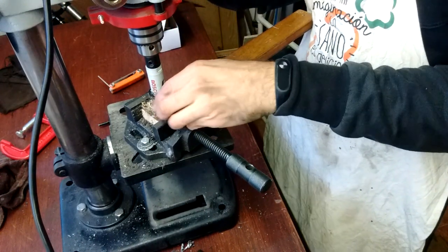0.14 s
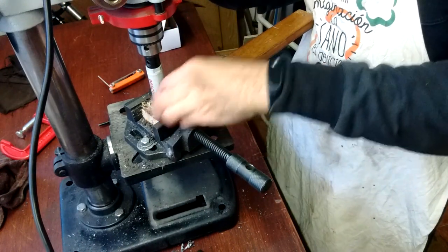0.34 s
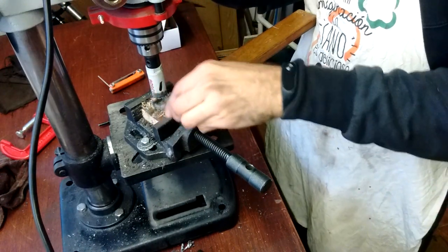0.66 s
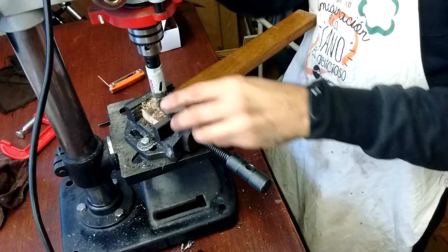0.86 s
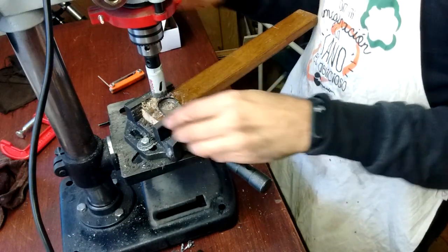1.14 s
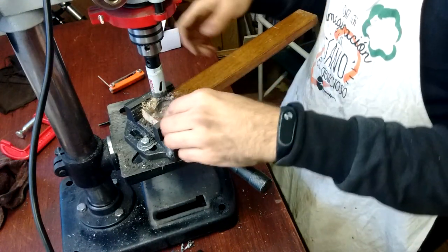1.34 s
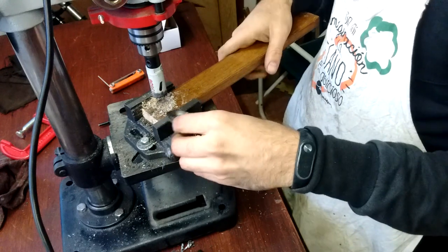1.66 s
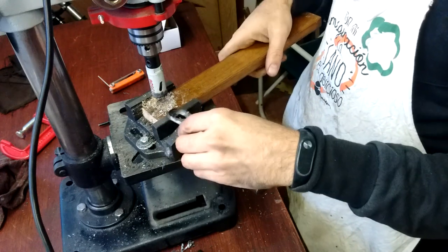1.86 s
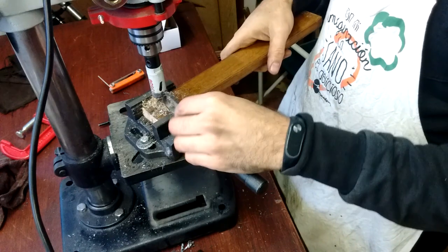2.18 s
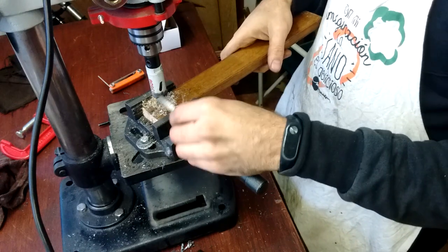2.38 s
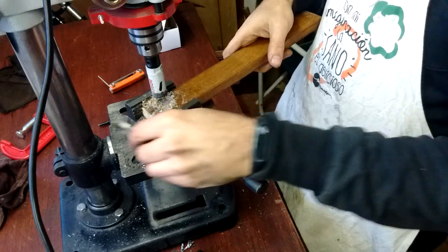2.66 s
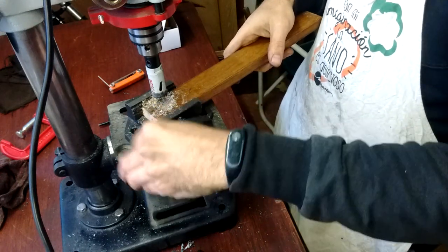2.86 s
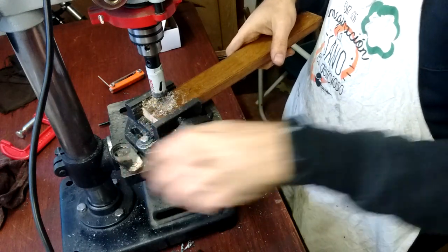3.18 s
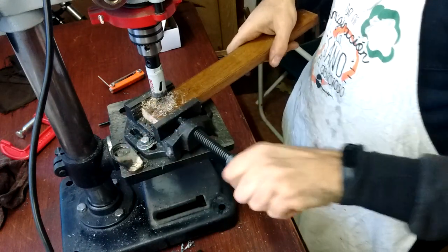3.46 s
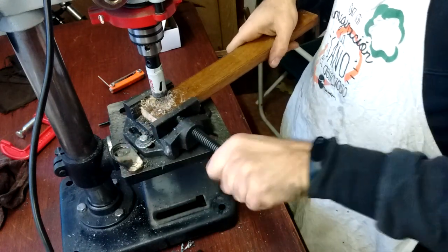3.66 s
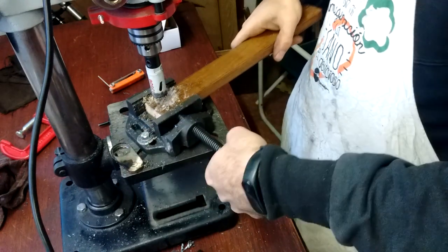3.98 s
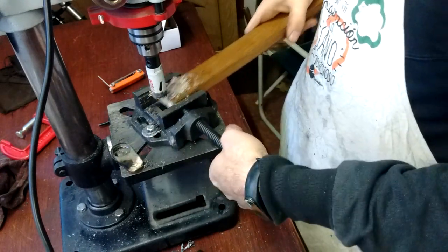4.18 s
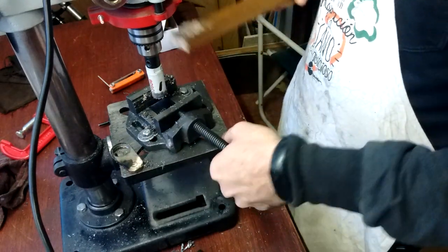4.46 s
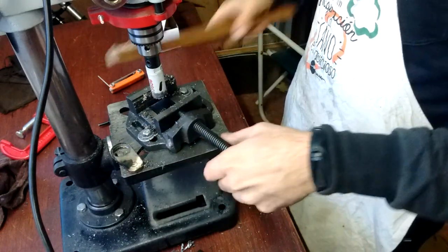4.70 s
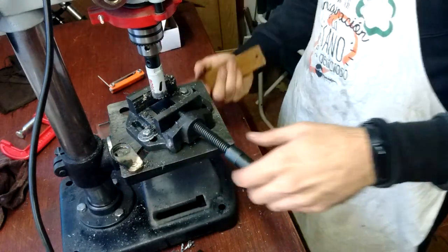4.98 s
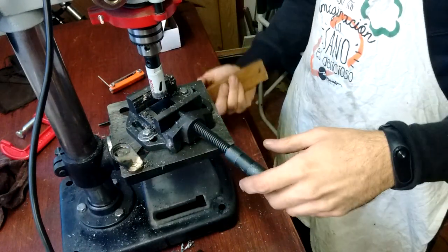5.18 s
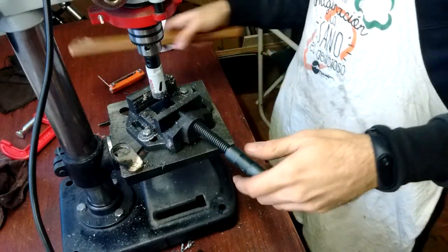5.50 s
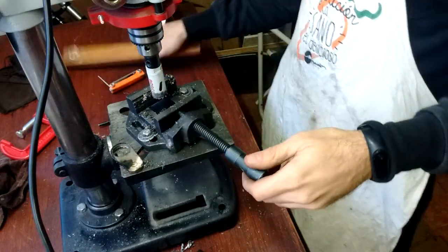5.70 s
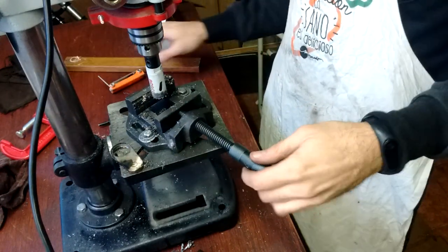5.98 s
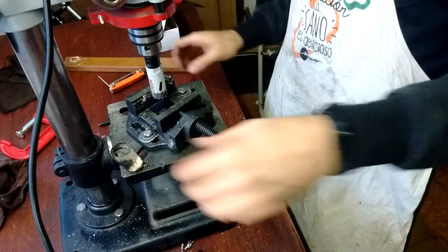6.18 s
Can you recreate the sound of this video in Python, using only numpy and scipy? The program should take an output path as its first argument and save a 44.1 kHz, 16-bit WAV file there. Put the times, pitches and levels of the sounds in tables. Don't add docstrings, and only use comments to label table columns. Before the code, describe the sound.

A steel key clinks and scrapes on an iron vise, the vise screw knocks loose, then a wooden board drags out, raps twice and clatters down.

```python
import sys
import numpy as np
from scipy import signal
from scipy.fft import rfft, irfft, next_fast_len
from scipy.io import wavfile
from scipy.ndimage import uniform_filter1d

SR = 44100
rng = np.random.default_rng(int(sys.argv[2]) if len(sys.argv) > 2 else 0)


def log_audio(samples):
    frames = np.atleast_2d(samples).T
    limited = np.clip(frames, -1, 1)
    pcm = np.round(limited * 32767).astype(np.int16)
    wavfile.write(sys.argv[1], SR, pcm)


def boost_factor(decibels):
    exponent = np.asarray(decibels, float) / 20
    return 10 ** exponent


N = 279594


def evened(x):
    return x / np.sqrt(np.mean(x ** 2) + 1e-20)


def peaked(x, db):
    return boost_factor(db) * x / abs(x).max()


def read(points, hz):
    f, value = np.transpose(points)
    return np.interp(np.log(hz + 1), np.log(f + 1), value)


def add(mix, start_s, sound):
    part = mix[round(start_s * SR):][:len(sound)]
    part += sound[:len(part)]


def shaped(x, gain):
    size = next_fast_len(x.shape[-1] + 2048)
    spectrum = rfft(x, size) * gain(np.fft.rfftfreq(size, 1 / SR))
    return irfft(spectrum, size)[..., :x.shape[-1]]


def band(x, low_hz, high_hz):
    return signal.sosfilt(signal.butter(2, [low_hz, high_hz], "band", fs=SR, output="sos"), x)


def pair(alike, z):
    alike = np.clip(alike, 0, 1)[:, None]
    return np.array([z[0], alike * z[0] + np.sqrt(1 - alike ** 2) * z[1]])


# start_s, depth_db
GAIN_DUCKS = [
    (-.45, 8),
    (.93, 8),
    (2.92, 7),
    (4.905, 13),
    (5.183, 16),
    (5.833, 17),
]


def ducking_db(t):
    start_s, depth_db = np.transpose(GAIN_DUCKS)[:, :, None]
    hold_s, recover_db_per_s = .45, 18.
    left_db = depth_db - recover_db_per_s * np.maximum(t - start_s - hold_s, 0)
    drop = np.clip((t - start_s) / .06, 0, 1)
    return -np.max(drop * np.maximum(left_db, 0), axis=0)


# freq_hz, density_db (per Hz)
FLOOR_CURVE = [(20, -27), (45, -6), (100, -1), (250, -5), (500, -7.5), (1000, -11.5), (2000, -18),
               (3500, -19.5), (6000, -24.5), (8500, -24.5), (10000, -25.5), (14500, -26.5), (15600, -27),
               (16200, -46)]
# freq_hz, width_hz, over_floor_db
ROOM_HUM = [(75, 10, 8), (98.7, 6.8, 12), (143, 2.7, 15.5), (215, 12, 9.5)]


def air():
    hz, t, z = signal.stft(rng.standard_normal((2, N)), SR, nperseg=4096)
    humming_db = sum(db / (1 + (2 * (hz - f) / width) ** 2) for f, width, db in ROOM_HUM)
    patches = uniform_filter1d(rng.standard_normal(z.shape[1:]), 40, 0)
    patches = evened(uniform_filter1d(patches, 2, 1))
    z = pair(.2 + 0 * hz, z)
    z = z * boost_factor((read(FLOOR_CURVE, hz) + humming_db)[:, None] + 0.67 * patches)

    def level_db(low_hz, high_hz):
        inside = z[0][(hz > low_hz) & (hz < high_hz)]
        return 10 * np.log10(np.mean(np.sum(abs(inside) ** 2, 0)) * 4 / 3)

    hum_db = -50. + .8 * ducking_db(t) - level_db(60, 400)
    hiss_db = -60. + ducking_db(t) - level_db(3000, 12000)
    hissy = np.clip(np.log(hz / 300 + 1e-9) / 5.4, 0, 1)[:, None]
    z = z * boost_factor((1 - hissy) * hum_db + hissy * hiss_db)
    return signal.istft(z, SR, nperseg=4096)[1][:, :N]


# freq_hz, t60_s
ROOM_DECAY = [(120, 0.39), (330, 0.58), (870, 0.46), (2300, 0.46), (6000, .35), (14000, 0.31)]
# freq_hz, likeness (0 to 1)
ROOM_LIKENESS = [(100, 0.826), (800, 0.73), (1800, 0.074), (16000, .1)]


def room(x):
    hz, t, z = signal.stft(rng.standard_normal((2, SR)), SR, nperseg=256)
    z = pair(read(ROOM_LIKENESS, hz), z) * boost_factor(-60 * t / read(ROOM_DECAY, hz)[:, None])
    tail = signal.istft(z, SR, nperseg=256)[1]
    tail *= np.clip(np.arange(tail.shape[1]) / SR / 0.0044, 0, 1)
    return signal.fftconvolve(x[None], tail / np.linalg.norm(tail[0]), axes=1)[:, :N]


def placed(x, lag, wet_db):
    late = shaped(x, lambda hz: np.exp(-2j * np.pi * hz * lag / SR))
    x, late = np.roll([x, late], 45, axis=1)
    return np.array([late, x]) + boost_factor(wet_db) * room(x)


def ringing(modes):
    t = np.arange(SR // 3) / SR
    return sum(boost_factor(db - 60 * t / t60) * np.sin(2 * np.pi * hz * t) for hz, db, t60 in modes)


# freq_hz, level_db
THUD_CURVE = [(60, -46), (200, -3), (500, -8), (1300, -3), (2500, -1), (5000, -4), (9000, -40.5)]


def dense_thud():
    t = np.arange(SR // 3) / SR
    noise = evened(shaped(rng.standard_normal(len(t)), lambda hz: boost_factor(read(THUD_CURVE, hz))))
    return noise * boost_factor(10. - 60 * t / 0.065)


# freq_hz, level_db
CRACK_CURVE = [(1500, -2.5), (2450, 7), (3600, 3), (6000, -7), (8500, -19), (11000, -20), (15500, -22.5),
               (16500, -45.5)]


def hit(modes, thin_hz, dull_hz, body_db, crack_db, note_hz, contact_hz, rattle_s):
    t = np.arange(2048) / SR
    chatter, snap = rng.standard_normal((2, len(t)))
    force = chatter * np.exp(-t / rattle_s) * 0.4
    force[0] += 3
    body = ringing(modes + [(note_hz, 4., .03)])
    body[0] += 40.
    sound = signal.fftconvolve(force, body)
    thud = dense_thud()
    thud[:len(t)] *= np.sqrt(np.cumsum(force ** 2) / np.sum(force ** 2))
    sound[:len(thud)] += thud * np.linalg.norm(force)
    contact = signal.butter(2, [thin_hz, contact_hz], "band", fs=SR)
    sound = peaked(signal.lfilter(*contact, sound), body_db)
    crack = shaped(snap, lambda hz: boost_factor(read(CRACK_CURVE, hz)) / (1 + (hz / dull_hz) ** 4))
    sound[:len(t)] += peaked(crack * np.exp(-t / (.5 * rattle_s)), crack_db + 13)
    return sound


def struck(rows, modes, thin_hz, dull_hz, contact_hz):
    out = np.zeros(N)
    for start_s, body_db, crack_db, note_hz, rattle_s in rows:
        add(out, start_s, hit(modes, thin_hz, dull_hz, body_db, crack_db, note_hz, contact_hz, rattle_s))
    return out


# freq_hz, level_db, t60_s
TABLE_MODES = [(162.5, -7.5, 0.047), (226, -7, 0.2), (345, -6, 0.2), (433, 6, 0.045), (595, -5.5, 0.086),
               (754, -4, 0.063), (1068.7, -5, 0.094), (1329, -8, 0.036), (1780, -17, 0.056)]
# freq_hz, level_db, t60_s
KEY_LOW_MODES = [(3760, 1, 0.05), (5450, 5, 0.076), (5440, -7, .3), (5462, -11, 0.18), (9590, -22, .08)]
# freq_hz, level_db, t60_s
KEY_HIGH_MODES = [(8190, -0.5, 0.097), (8370, -9.5, 0.081), (8160, -11.5, .3), (11430, -14, 0.2),
                  (15330, -8, .1), (15280, -18, .2)]


def rub(rumble_db, bite_db, squeak_hz, reach, fizz_under_db, touch_db):
    n = len(rumble_db)
    grit_db = rumble_db + bite_db
    fizz_db = rumble_db + reach * bite_db + fizz_under_db
    chance, size = rng.random(n), rng.exponential(1, n)
    hiss, grip, spray = rng.standard_normal((3, n))

    clumps = boost_factor(3.6 * evened(uniform_filter1d(grip, 300)))
    slipping = chance < 1800 / SR
    slips = evened(slipping * boost_factor(3.2 * np.minimum(size, 5)) * np.sign(hiss)) + 0.42 * hiss
    slips = evened(slips * clumps) * signal.windows.tukey(n, .1)

    def through(db, body):
        return signal.fftconvolve(slips * boost_factor(db), body / np.linalg.norm(body))

    out = through(rumble_db - 3.5, ringing(TABLE_MODES))
    out += through(grit_db + touch_db, ringing(KEY_LOW_MODES))
    out += through(fizz_db + touch_db + 4, ringing(KEY_HIGH_MODES))

    turn, r = np.exp(2j * np.pi * np.cumsum(squeak_hz) / SR), np.exp(-np.pi * 45. / SR)
    squeak = evened((turn * signal.lfilter([1], [1, -r], slips / turn)).real)
    lock_db = 14. / (1 + (2 * (squeak_hz - 433.) / 60.) ** 2)
    out[:n] += squeak * boost_factor(rumble_db - 13. + lock_db)

    out[:n] += boost_factor(rumble_db - 12.5) * evened(band(slips, 250, 1100))
    out[:n] += boost_factor(grit_db - 4.5) * evened(band(slips, 2500, 4700))
    out[:n] += boost_factor(rumble_db - 22.) * evened(band(slips, 70, 170))
    out[:n] += boost_factor(fizz_db + 1.0) * evened(band(slips + .2 * spray, 4800, 13000))
    return out


def stroke(length_s, pressure_db, bite_db, squeak_hz):
    t = np.arange(0, length_s, 1 / SR)
    u = t / length_s
    bite_in_db = -20 * np.clip(1 - t / .008, 0, 1)
    return pressure_db + bite_in_db - 10. * u ** 2, bite_db, squeak_hz * (1 - .08 * u)


def strokes(rows, **material):
    out = np.zeros(N)
    for start_s, *controls in rows:
        add(out, start_s, rub(*stroke(*controls), **material))
    return out


# start_s, length_s, pressure_db, bite_db, squeak_hz
WOOD_STROKES = [
    (3.41, .06, -48, -12, 300),
    (3.466, .075, -36, -10, 320),
    (5.766, .025, -34, -15, 750),
    (5.85, .09, -25, -6, 1780),
    (5.975, .09, -29, -7, 1080),
]


def wood_rubs():
    return strokes(WOOD_STROKES, reach=.9, fizz_under_db=-38., touch_db=-40.)


# start_s, pressure_db, bite_db, squeak_hz
DRAG_PATH = [
    (3.98, -27, -20, 634),
    (4.05, -31, -4, 700),
    (4.17, -29, -5, 600),
    (4.21, -25, -2, 450),
    (4.26, -36, 5, 1750),
    (4.32, -38, 7, 1780),
    (4.36, -30, -8, 1080),
    (4.46, -29, -5, 345),
    (4.56, -50, -8, 350),
]


def board_slide():
    start_s, *columns = np.transpose(DRAG_PATH)
    t = np.arange(start_s[0], start_s[-1], 1 / SR)
    controls = [np.interp(t, start_s, column) for column in columns]
    out = np.zeros(N)
    add(out, start_s[0], rub(*controls, reach=.9, fizz_under_db=-12., touch_db=-30.))
    return out


# start_s, length_s, pressure_db, bite_db, squeak_hz
KEY_STROKES = [(0., .36, -49, -14, 1200), (.358, .16, -22, -22, 455), (.55, .2, -52, 4, 520),
               (.815, .09, -34, -20, 820), (1.358, .1, -44, -1, 300), (1.6, .11, -39, -7, 700),
               (1.725, .075, -35, -17, 445), (1.83, .14, -38, -5, 1300), (1.972, .05, -34, -27, 480),
               (2.05, .18, -39, -10, 720), (2.24, .1, -43, -10, 600)]


def key_rubs():
    return strokes(KEY_STROKES, reach=.55, fizz_under_db=-18., touch_db=-15.)


# freq_hz, level_db, t60_s
BENCH_MODES = [(233, -14, .12), (442, -3.5, 0.024), (750, -9, .05), (900, -17, 0.013), (1007, -3, 0.08),
               (1330, 0, 0.09), (1460, -1, 0.031), (1780, 6, 0.082), (2362, 0, 0.025), (3030, 1, 0.15),
               (3223, 9, 0.03), (3480, -14, .06)]
# start_s, body_db (peak), crack_db, note_hz, rattle_s
LAY_DOWN = [
    (5.766, -37.5, -65, 498, 0.004),
    (5.833, 0, -22, 1770, 0.002),
    (5.84, 2.5, -24.5, 1780, 0.0019),
    (5.883, -13, -39, 1810, 0.0026),
    (5.957, -7.5, -21, 1420, 0.0055),
]


def bench_clatter():
    return struck(LAY_DOWN, BENCH_MODES, thin_hz=290.0, dull_hz=5200.0, contact_hz=2800.)


# freq_hz, level_db, t60_s
VISE_MODES = [(224, -9.5, 0.42), (345, -21, 0.24), (459, -6, 0.12), (600, -10, 0.1), (742, 3.5, 0.018),
              (1064.6, -10, 0.09), (1348, -10, 0.065), (1510, -17, 0.12), (2264, 5, 0.044),
              (2970, -7, 0.11), (3020, -10.5, 0.076), (3680, -2, .05), (4480, -11.5, 0.03)]
# start_s, body_db (peak), crack_db, note_hz, rattle_s
SCREW_KNOCKS = [(0.372, -11.5, -25.5, 793, 0.0055), (0.391, -8, -38, 430, 0.0046),
                (0.464, -15, -38, 587, 0.004), (0.499, -24, -45, 1350, 0.004),
                (3.468, -36, -31, 747, 0.011), (3.541, -4, -14, 1300, 0.003), (3.762, -5.5, -17, 420, 0.01),
                (3.958, -7, -36.5, 1000, 0.0033), (4.004, -22.5, -31, 604, 0.0059),
                (4.179, -18, -31, 1050, 0.006), (4.196, -13, -32.5, 600, 0.0029),
                (4.212, -18, -36, 230, 0.004), (4.313, -22, -22.5, 1760, 0.0068),
                (4.43, -22, -45, 345, 0.015), (4.49, -34.5, -36, 334, 0.0062)]
# start_s, body_db (peak), crack_db, note_hz, rattle_s
KEY_BOUNCE = [
    (2.9258, -2, -24, 1388, 0.0016),
]


def vise_knocks():
    knocks = struck(SCREW_KNOCKS, VISE_MODES, thin_hz=300., dull_hz=8500.0, contact_hz=1700.)
    return knocks + struck(KEY_BOUNCE, VISE_MODES, thin_hz=750., dull_hz=11000.0, contact_hz=1900.)


# start_s, body_db (peak), tick_db, note_hz, high_ring_db
KEY_CLINKS = [(0.818, -30, -56, 791, -70), (0.82, -33, -47, 1120, -68), (0.894, -25, -52, 740, -61),
              (0.907, -17, -27, 1500, -45), (0.929, -22, -19, 1175, -20), (0.955, -26, -46, 740, -27.5),
              (1.36, -27, -50, 732, -68), (1.407, -24, -47, 221, -72), (1.596, -19, -45, 644, -53),
              (1.81, -12, -27, 1306, -25), (1.864, -24, -45, 1310, -46), (1.972, -15, -64, 410, -58),
              (2.027, -14.5, -27, 780, -36), (2.108, -40, -40, 342, -40.5), (2.149, -27, -45, 587, -43),
              (2.241, -16, -50, 226, -62), (3.272, -46, -63, 511, -72)]


def key_clinks():
    out, low, high = np.zeros(N), ringing(KEY_LOW_MODES), ringing(KEY_HIGH_MODES)

    def clink(start_s, body_db, tick_db, note_hz, high_db, held_db=0):
        add(out, start_s, hit(VISE_MODES, 300., 21000.0, body_db - 6, tick_db - 1.5, note_hz, 3200.0, 0.0059))
        add(out, start_s, peaked(low, tick_db + held_db + 9.5) + peaked(high, high_db + 4))

    for row in KEY_CLINKS:
        clink(*row)
    clink(start_s=2.915, body_db=-2.5, tick_db=-12.5, note_hz=1520, high_db=-30, held_db=-21.)
    return out


# freq_hz, level_db, t60_s
BOARD_MODES = [(119, -9, 0.14), (226, -1, 0.2), (289, -2, 0.041), (345, -4.5, 0.087), (415, -0.5, .06),
               (452, -2, 0.073), (635, 1, 0.045), (760, 2, .05), (940, -1, 0.056), (1000, 0, 0.067),
               (1100, -4, 0.034), (1486, -9, 0.032)]
# start_s, body_db (peak), crack_db, note_hz, rattle_s
BOARD_HITS = [
    (4.905, 5, -20, 586, 0.0015),
    (5.183, 1.5, -31, 604, 0.0032),
    (5.274, -15, -60, 620, .003),
    (5.792, -2, -38, 486, 0.0018),
]


def board_raps():
    return struck(BOARD_HITS, BOARD_MODES, thin_hz=90., dull_hz=17000.0, contact_hz=1050.)


# freq_hz, level_db
LEFT_SHADE = [(100, -4.5), (500, -5.5), (1500, -4.5), (4500, -10), (9000, -4), (11000, -20.5), (16000, -21)]


def scene():
    rubs = key_rubs() + wood_rubs() + board_slide()
    close = placed(rubs, lag=5.43, wet_db=-3.)
    close += placed(bench_clatter(), lag=4.5, wet_db=-2.5)
    close += placed(vise_knocks(), lag=5.2, wet_db=-6.0)
    close += placed(key_clinks(), lag=4.76, wet_db=-8.5)
    close += placed(board_raps(), lag=4.9, wet_db=-4.0)
    no_bass = signal.butter(3, 108., "high", fs=SR, output="sos")
    close = signal.sosfilt(no_bass, close)
    shaded = shaped(close[0], lambda hz: boost_factor(read(LEFT_SHADE, hz)))
    return np.array([shaded, close[1]]) + air() * boost_factor(np.array([[-1.5], [1.5]]))


def masked(x, margin_db=7.3, cut_db=-24.):
    hz, t, z = signal.stft(np.array([x[0] + x[1], x[0] - x[1]]) / 2, SR, nperseg=1024)
    power = uniform_filter1d(uniform_filter1d(abs(z) ** 2, size=7, axis=1), size=2, axis=2)
    around = np.exp(uniform_filter1d(np.log(power.mean(0) + 1e-20), size=61, axis=0))
    hidden = (power < around * boost_factor(-2 * margin_db)) & (hz > 1900)[:, None]
    mid, side = signal.istft(z * np.where(hidden, boost_factor(cut_db), 1), SR, nperseg=1024)[1][:, :N]
    return np.array([mid + side, mid - side])


def low_pass(x):
    return signal.sosfilt(signal.butter(12, 16420, fs=SR, output="sos"), x)


# freq_hz, share (0 to 1)
CROSS_SHARE = [(250, 0.055), (700, 0.65), (1200, 0.46), (5200, 0.54), (7000, 0.38), (9000, 0.36),
               (11000, 0.038)]
# freq_hz, level_db
CAPSULE = [(6000, 1), (7350, 1), (8500, 2), (14000, -2), (15450, -2), (15700, -16), (16400, -20)]


def record(dry):
    delay_s = 1 / 2455
    other = shaped(dry[::-1], lambda hz: np.clip(read(CROSS_SHARE, hz), 0, 1) * np.exp(-2j * np.pi * hz * delay_s))
    coloured = shaped(dry - other, lambda hz: boost_factor(read(CAPSULE, hz)))
    mix = masked(np.clip(coloured, -1, 1))
    return low_pass(mix)


dry = scene()
out = record(dry)
log_audio(out)
```